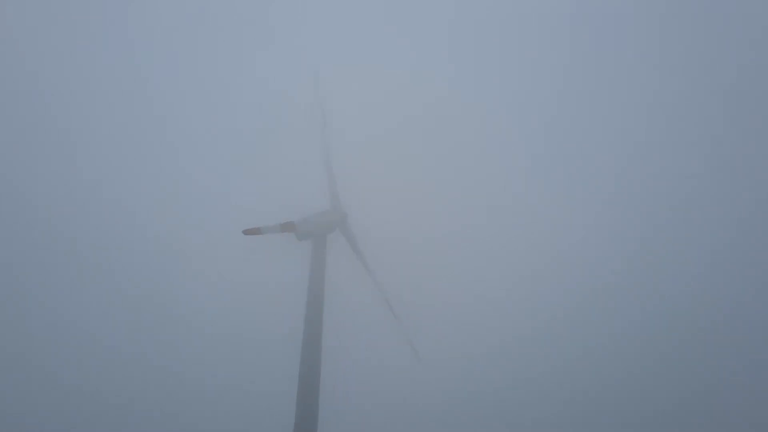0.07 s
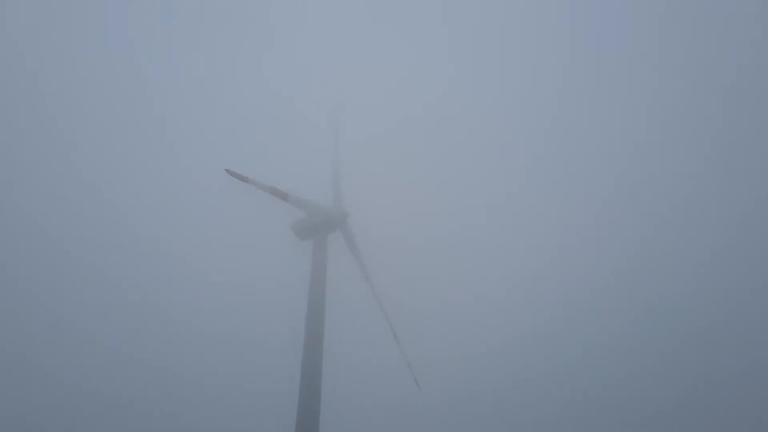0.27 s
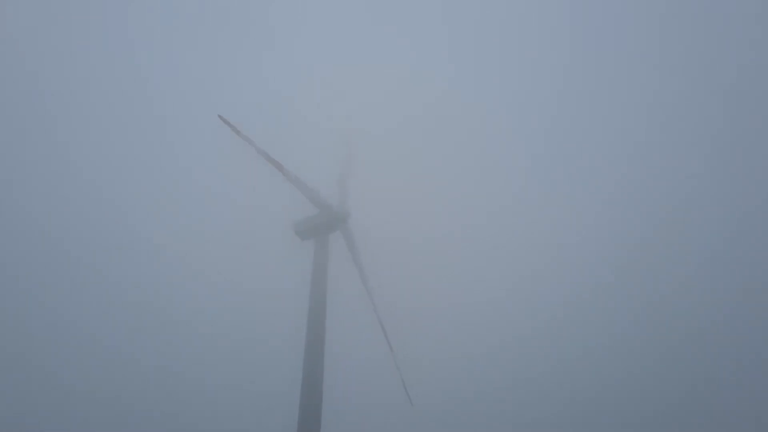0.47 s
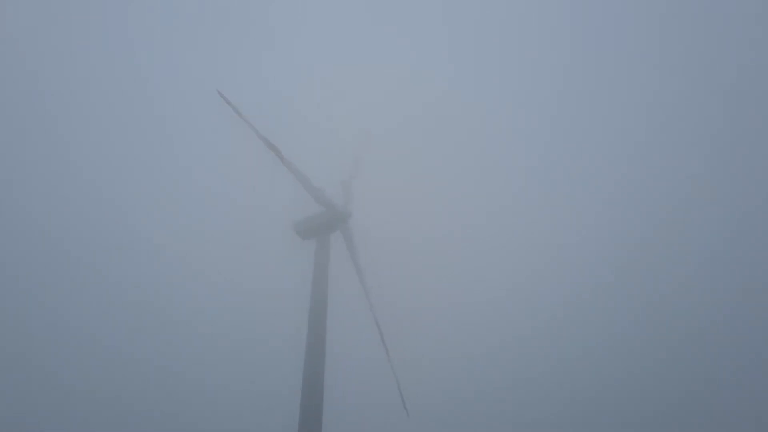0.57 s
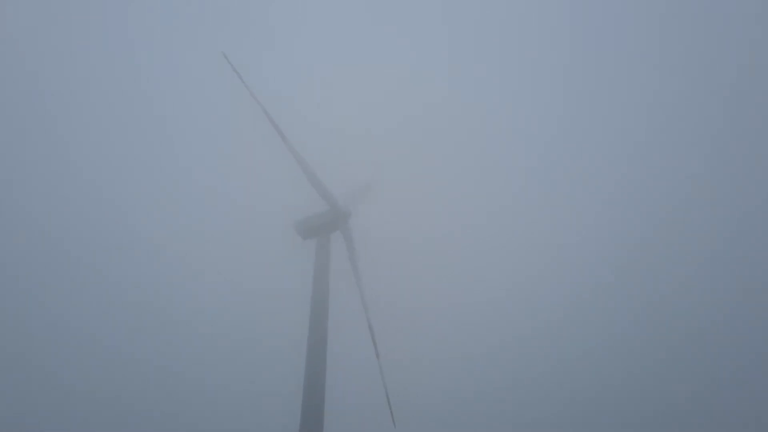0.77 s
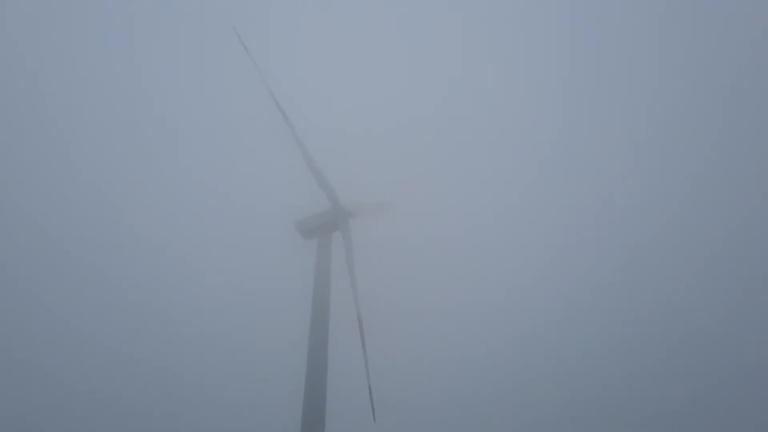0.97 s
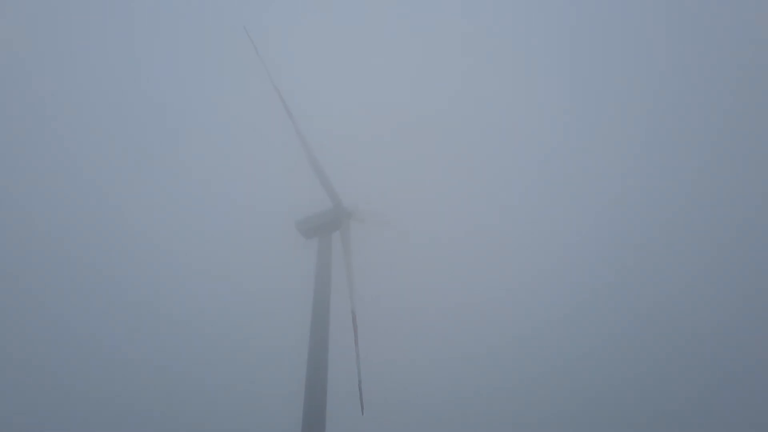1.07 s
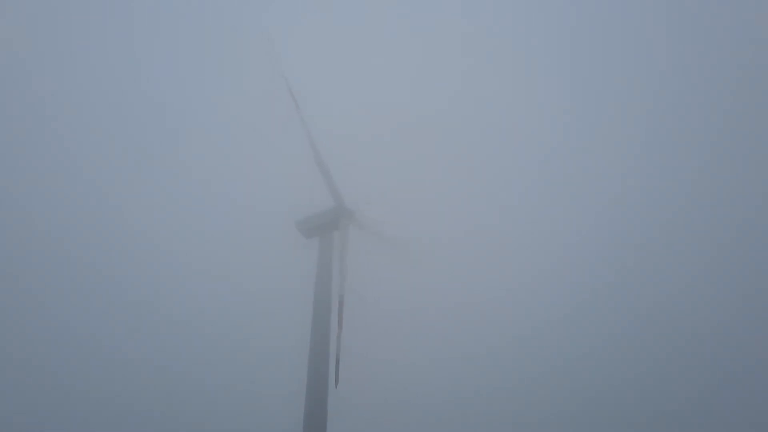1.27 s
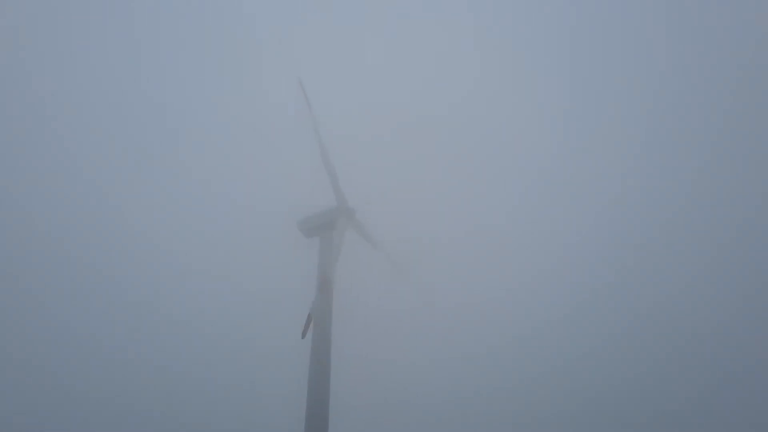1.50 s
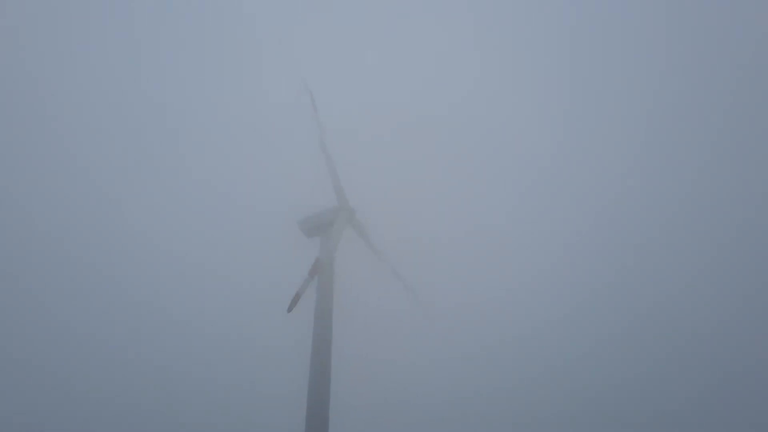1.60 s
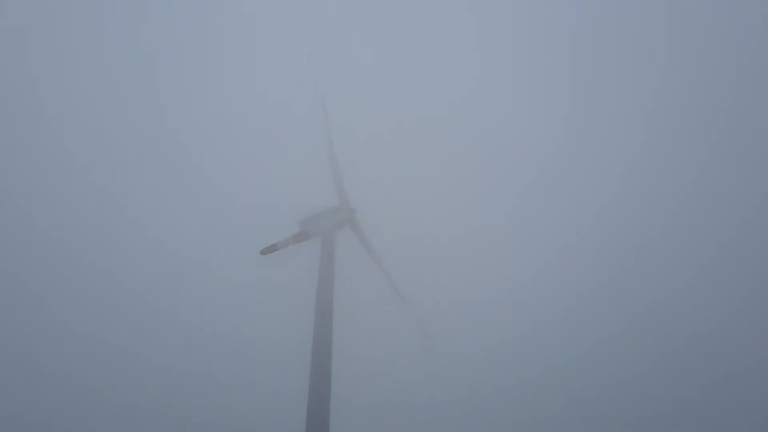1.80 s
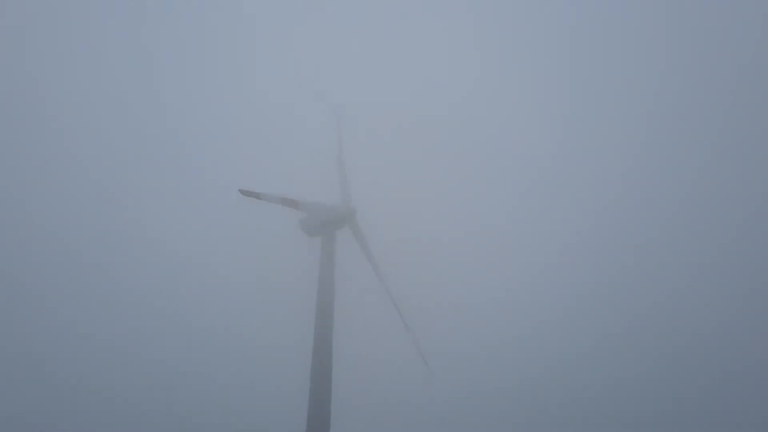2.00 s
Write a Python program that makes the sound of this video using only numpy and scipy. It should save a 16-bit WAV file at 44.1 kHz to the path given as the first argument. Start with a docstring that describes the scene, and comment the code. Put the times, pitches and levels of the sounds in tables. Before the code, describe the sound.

Gusty wind strikes a small unshielded stereo microphone in open country, building into rapid low thumps and hollow flutter, then easing after about a second to weak rumble over faint far air rush and hiss.

```python
"""Gusty wind buffets the two ports of a small microphone in open country, over a far rush of air and recorder hiss.
At first the gusts come and go, and an airy rustle, mostly on the left, fades away.
Then strong eddies slap the ports: each gives a low thump and a ring of the port cavity near 300 Hz.
Deep thuds rock both ports together from early on, and one tiny tick sounds among the slaps.
After about a second the wind eases, leaving low thumps, a few thuds, the rush and the hiss."""
import sys
import numpy as np
from scipy import signal
from scipy.fft import rfft, irfft
from scipy.io import wavfile
from scipy.ndimage import uniform_filter1d

SR = 44100
rng = np.random.default_rng(int(sys.argv[2]) if len(sys.argv) > 2 else 0)


def boost(x):
    """Linear amplitude factor 10**(x/20) for a level x in decibels (scalar or array-like)."""
    u = np.asarray(x, float) / 20
    return 10 ** u


def to_wav(s):
    """Save 16-bit WAV."""
    ch = np.atleast_2d(s).T  # columns
    pcm = np.round(np.clip(ch, -1, 1) * 32767)  # PCM
    wavfile.write(sys.argv[1], SR, pcm.astype(np.int16))


N = 90404

# In every table a positive left-right figure means that the left is louder.
# Tone of the low thump. Each row: frequency in Hz, relative level in dB per Hz.
THUMP_TONE = [(20, -18.5), (40, -13), (65, -2), (95, -1), (140, -2.5), (180, -5), (230, -18.5),
              (300, -43.5), (500, -73)]
# Tone of the ringing port cavity. Each row: frequency in Hz, relative level in dB per Hz.
RING_TONE = [(150, -30.5), (220, -7), (300, 1), (380, -7), (500, -15.5), (700, -29), (1000, -45),
             (1500, -60), (3000, -74.5)]
# Low thumping of the wind. Each row: time in seconds, level in dB before a fixed lift, left-right in dB.
THUMP_CURVE = [(0, -37.5, -7.5), (.1, -52.5, -4), (.13, -34, -7.5), (.16, -57, -7), (.19, -55, 14),
               (.225, -35.5, -2), (.29, -40, 5), (.32, -44.5, -27.5), (.36, -27, -2.5), (.4, -26, -3.5),
               (.43, -42, -1.5), (.48, -46.5, -3), (.505, -29.5, -15.5), (.55, -33.5, 5), (.62, -41, -4),
               (.66, -35, -0.5), (.71, -43, 3.5), (.78, -33.5, 1.5), (.825, -48, 16.5), (.85, -39, 7),
               (.93, -56.5, -7), (.97, -38, 1.5), (1.05, -48.5, 10), (1.09, -43.5, -25),
               (1.16, -44.5, -2.5), (1.2, -43, -20), (1.22, -40, -9), (1.245, -44, -11), (1.3, -50, -12),
               (1.345, -44.5, -5), (1.41, -47.5, -34), (1.49, -55.5, -31), (1.53, -42, -1), (1.58, -54, -4),
               (1.62, -49, -48), (1.68, -62.5, -39), (1.755, -43.5, -10), (1.83, -52, -42), (1.89, -44, -9),
               (1.96, -44, 9.5), (2.01, -55.5, 15), (2.05, -44, 47)]
# Steady ring of the cavity between the slaps. Each row: time in seconds, level in dB.
RING_CURVE = [(.19, -52.5), (.235, -40), (.3, -39.5), (.42, -49), (.45, -36), (.58, -38), (.77, -40),
              (.81, -46.5), (.89, -37.5), (.94, -40.5), (1.02, -38), (1.055, -54), (1.5, -79), (2.05, -74)]
# Change of the ring's upper edge. Each row: time in seconds, gain in dB.
RING_EDGE_CURVE = [(0.25, 1.5), (.5, -4), (.8, -3), (.91, 2.5), (1.02, 9), (1.1, 2)]
# Strong eddies that slap the ports. Each row: time of the peak in seconds, ring level in dB, left-right in dB.
SLAP_EVENTS = [(0.116, -38.5, 3), (0.141, -47.5, 6), (0.249, -26, 0), (0.266, -36, -3), (0.312, -41, 13),
               (0.35, -31.5, 2.5), (.376, -22, 0.5), (0.393, -19, 0.5), (0.444, -28, -0.5), (0.46, -23, -5),
               (0.501, -19, -1.5), (.561, -21.5, 0), (0.596, -31, 14), (0.633, -32, 0),
               (0.656, -20.5, -1.5), (.674, -27.5, -21), (.718, -23, 2.5), (0.756, -18.5, 3),
               (0.785, -22.5, -6.5), (0.836, -40.5, 9.5), (0.853, -24.5, -2), (0.908, -24.5, 2.5),
               (.927, -22, -2.5), (0.961, -25.5, -10.5), (1.016, -24, 3.5), (1.779, -43.5, 5),
               (1.987, -38, -4.5)]
# Tone of the far rush of air. Each row: frequency in Hz, relative level in dB per Hz.
RUSH_TONE = [(140, -35), (230, -5), (298, 0.02), (440, -2), (580, -9), (781, -19), (1060, -19), (1170, -26),
             (1520, -26.5), (1760, -30), (2100, -27), (2380, -22), (2680, -33), (3050, -42), (4000, -73)]
# Balance of the rush, with the left port's own resonance. Each row: frequency in Hz, left-right in dB.
RUSH_SIDES = [(250, 0), (500, -2), (1000, -3), (1700, 0.5), (2500, 13.5), (4000, -2.5)]
# How alike the rush is on both sides. Each row: frequency in Hz, likeness from 0 to 1.
RUSH_ALIKE = [(250, 0.47), (700, 0.81), (1100, 0.26), (2500, 0.2), (4000, 0.05)]
# Slow swell of the rush; only the changes count.
# Each row: time in seconds, level near 1 kHz in dB, level near 2.4 kHz in dB.
RUSH_SWELL = [(0, -73.5, -76), (.2, -74.5, -79.5), (.75, -77, -79), (1.05, -75.5, -76), (1.4, -78.5, -77.5),
              (1.8, -81, -76), (2.05, -82.5, -79)]
# Tone of the recorder hiss. Each row: frequency in Hz, relative level in dB per Hz.
HISS_TONE = [(2500, -4.5), (3200, 3.5), (4500, 0), (6000, -2.5), (8000, -3), (10500, -3), (13000, 1),
             (15500, -6.5), (16500, -31.5)]
# Loudness of the hiss. Each row: time in seconds, level in dB.
HISS_CURVE = [(0, -84), (.8, -81), (1.6, -85.5), (2.05, -84)]
# Tone of the airy rustle. Each row: frequency in Hz, relative level in dB per Hz.
RUSTLE_TONE = [(5800, -31), (7000, -2), (9000, -0.5), (11000, -0.5), (12500, -3), (15500, -5.5),
               (16500, -38.5)]
# Loudness of the rustle on the left, before its flicker. Each row: time in seconds, level in dB.
RUSTLE_CURVE = [(0, -75.5), (.36, -77), (.42, -79.5), (.65, -83.5), (.85, -102.5)]
# Deep single thuds. Each row: time of the middle in seconds, level there in dB, pitch in Hz.
THUD_EVENTS = [(0.057, -30.5, 100), (.285, -33, 55), (.392, -15.5, 84), (.507, -16.5, 103.6),
               (0.656, -22, 70.1), (0.991, -24, 133), (1.263, -29, 97), (1.551, -32.5, 77),
               (1.903, -36.5, 79.5)]
# The tiny tick. Each row: start in seconds, level in dB, left-right in dB.
TICK_EVENTS = [(0.7437, -58.5, 15)]


def rms_one(x):
    """Scale every channel to rms 1."""
    return x / np.sqrt(np.mean(x ** 2, axis=-1, keepdims=True) + 1e-20)


def in_time(rows):
    """Read the columns of a time table at every sample."""
    s, *columns = np.transpose(rows)
    return [np.interp(np.arange(N) / SR, s, c) for c in columns]


def at_hz(points, hz):
    """Read a frequency table on a log-frequency axis, with -120 outside it."""
    p = np.array(points)
    return np.interp(np.log(np.maximum(hz, 1)), np.log(p[:, 0]), p[:, 1], left=-120, right=-120)


def colour(x, spectrum):
    """Filter x with the tone of a table, never ahead of time (minimum phase), and scale to rms 1."""
    bins = np.arange(N // 2 + 1) * SR / N
    cepstrum = irfft(np.log(boost(at_hz(spectrum, bins))), N)
    # Folding the second half onto the first makes the filter minimum-phase.
    cepstrum[1:N // 2] *= 2
    cepstrum[N // 2 + 1:] = 0
    response = np.exp(rfft(cepstrum))
    return rms_one(irfft(rfft(x) * response, N))


def sides(pan_db):
    """Left and right gains of constant power."""
    g = boost(np.array([pan_db / 2, -pan_db / 2]))
    return g / np.sqrt(np.mean(g ** 2, axis=0))


def drift(rate_hz):
    """Slow random wander with spread 1, computed at every 40th sample."""
    r = np.exp(-80 * np.pi * rate_hz / SR)
    slow = signal.lfilter([1], [1, -2 * r, r * r], rng.standard_normal(N // 40 + 2002))
    slow = rms_one(slow[2000:])  # skip the filter's start
    return np.interp(np.arange(N) / 40, np.arange(len(slow)), slow)


def evened(x, window_s):
    """Divide out most of the slow level so that the loudness curves can set it."""
    size = int(window_s * SR)
    power = uniform_filter1d(uniform_filter1d(x ** 2, size=size), size=size)
    return rms_one(x / np.sqrt(power + 0.033))


def above(x, cut_hz):
    """The part of x above a frequency, without delay."""
    return signal.sosfiltfilt(signal.butter(2, cut_hz, "high", fs=SR, output="sos"), x)


def eddies():
    """Small eddies are pressure jolts, mostly pushes at the left port and pulls at the right."""
    EDDIES_PER_S, EDDY_SPREAD_DB = 300, 4  # average count per port; average size above the smallest
    PUSH_SHARE, SMOOTH_SHARE = 0.661, 0.57  # share of pushes (left) or pulls (right); smooth noise to jolts
    size_draw, sign_draw, when_draw = rng.random((3, 2, N))
    sizes = boost(EDDY_SPREAD_DB * np.minimum(-np.log(size_draw + 1e-9), 4))
    sign = np.tanh((PUSH_SHARE - sign_draw) * 20) * [[1], [-1]]
    jolts = rms_one(sizes * sign * (when_draw < EDDIES_PER_S / SR))
    return jolts + SMOOTH_SHARE * rng.standard_normal((2, N))


def slaps(jolts, power):
    """Strong eddies add a big jolt at each port and a short flare to the power of the ring."""
    RISE_S, FALL_S = 0.0044, 0.0084
    JOLT, LEAD_S = 2.2, 0.00311  # jolt size; usual lead of the jolt over the flare's peak
    lateness_s = rng.uniform(-0.0017, 0.0013, (len(SLAP_EVENTS), 2))
    for (s, db, pan_db), late in zip(SLAP_EVENTS, lateness_s):
        t = np.arange(N) / SR - s
        flare = np.where(t < 0, np.exp(-(t / RISE_S) ** 2), np.exp(-np.abs(t) / FALL_S))
        power = power + (boost(db) * sides(np.array([pan_db])) * flare) ** 2
        jolt_at = ((s - LEAD_S + late) * SR).astype(int)
        jolts[[0, 1], jolt_at] += JOLT * np.array([1, -1])
    return jolts, power


def port_thump(jolts, ring_db):
    """The jolts push each port with a low thump, brighter in stronger wind."""
    UPPER_HZ, UPPER_FOLLOWS = 126, 0.31  # second: dB of upper thump per dB of steady ringing
    thump = evened(colour(jolts, THUMP_TONE), window_s=0.021)
    brighten = boost(UPPER_FOLLOWS * (ring_db - ring_db.mean())) - 1
    return thump + above(thump, UPPER_HZ) * brighten


def cavity_ring(jolts):
    """The jolts set the port cavity ringing near 300 Hz, with an upper edge that varies."""
    LIKENESS, EDGE_HZ, EDGE_BALANCE_DB = 0.044, 390, 4
    unlike = jolts - LIKENESS * jolts[::-1]  # a little of the other port, upside down
    ring = evened(colour(unlike, RING_TONE), window_s=0.016)
    [edge_db] = in_time(RING_EDGE_CURVE)
    edge_gain = boost(edge_db) * sides(np.array([EDGE_BALANCE_DB]))
    return ring + above(ring, EDGE_HZ) * (edge_gain - 1)


def wind():
    """The same jolts drive thump and ring; slaps flare the ring and add a lump of thump."""
    THUMP_LIFT_DB, SLAP_THUMP = 4, 0.21  # second: share of the ring's power added to the thump's
    thump_db, thump_pan = in_time(THUMP_CURVE)
    [ring_db] = in_time(RING_CURVE)
    steady_power = boost(2 * ring_db) * np.ones((2, 1))
    jolts, ring_power = slaps(eddies(), steady_power)
    lumps = uniform_filter1d(ring_power, size=SR // 80)
    thump_power = (boost(thump_db + THUMP_LIFT_DB) * sides(thump_pan)) ** 2 + SLAP_THUMP * lumps
    return np.sqrt(thump_power) * port_thump(jolts, ring_db) + np.sqrt(ring_power) * cavity_ring(jolts)


def rush():
    """Third-octave bands of far noise, each flickering a little; the upper ones swell slowly."""
    LEVEL_DB, FLICKER_DB, FLICKER_HZ = -60, 1.2, 4.3  # level before swell and flicker
    low_db, high_db = in_time(RUSH_SWELL)
    bins = np.arange(N // 2 + 1) * SR / N
    shaped = rfft(rng.standard_normal((2, N))) * boost(at_hz(RUSH_TONE, bins))
    scale = np.sqrt(np.mean(irfft(shaped, N) ** 2))
    edges = 200 * 2 ** (np.arange(14) / 3)
    out = 0
    for low, high in zip(edges, edges[1:]):
        mid, side = irfft(shaped * ((bins >= low) & (bins < high)), N) / scale
        hz = np.clip(np.sqrt(low * high), 250, 4000)
        alike = np.clip(at_hz(RUSH_ALIKE, hz), 0, .99)
        swell = (low_db - low_db[-1]) * (750 < hz < 1300)
        swell = swell + (high_db - high_db.mean()) * (1700 < hz < 3000)
        gain = boost(swell + FLICKER_DB * drift(FLICKER_HZ)) * sides(np.array([at_hz(RUSH_SIDES, hz)]))
        # The shared part is the same on both sides, the other part is opposite.
        out = out + gain * (np.sqrt(1 + alike) * mid + np.sqrt(1 - alike) * side * [[1], [-1]])
    return boost(LEVEL_DB) * out


def hiss():
    """Smooth recorder hiss: separate filtered noise on each side."""
    BALANCE_DB = 1  # left-right
    [level_db] = in_time(HISS_CURVE)
    noise = colour(rng.standard_normal((2, N)), HISS_TONE)
    return boost(level_db) * sides(np.array([BALANCE_DB])) * noise


def rustle():
    """Airy, flickering noise at the left port, weaker on the right, that fades."""
    FLICKER_DB, FLICKER_HZ, RIGHT_DB = 1.5, 15, -14
    [level_db] = in_time(RUSTLE_CURVE)
    level = boost(level_db + FLICKER_DB * drift(FLICKER_HZ))
    noise = level * colour(rng.standard_normal(N), RUSTLE_TONE)
    return noise * boost(np.array([[0], [RIGHT_DB]]))


def thuds():
    """A large eddy rocks both ports together through a few slow swings."""
    HALF_LENGTH_CYCLES = 0.76  # from the middle to 1/e of the level
    PHASE_SPREAD = .6  # radians, at most, by which each port leads or lags
    out = 0
    chances = rng.uniform(-1, 1, (len(THUD_EVENTS), 2))
    for (s, db, hz), (phase, apart) in zip(THUD_EVENTS, chances):
        cycles = (np.arange(N) / SR - s) * hz
        port_phase = PHASE_SPREAD * apart * np.array([[1], [-1]])
        swing = np.cos(2 * np.pi * cycles + np.pi * phase + port_phase)
        out = out + boost(db) * np.exp(-(cycles / HALF_LENGTH_CYCLES) ** 2) * swing
    return out


def ticks():
    """A tiny tick: a snap of bright noise and a short ring of the casing."""
    SNAP_T60_S, SNAP_CUT_HZ = .008, 3700  # T60: time to fall by 60 dB
    RING_HZ, RING_T60_S, RING_DB = 2630, 0.012, -2.5  # ring level is relative to the tick's
    out = np.zeros((2, N))
    sharp = signal.butter(2, SNAP_CUT_HZ, "high", fs=SR, output="sos")
    for s, db, pan_db in TICK_EVENTS:
        t = np.clip(np.arange(N) / SR - s, 0, None)
        burst = rng.standard_normal(N) * (t > 0) * boost(-60 * t / SNAP_T60_S)
        snap = signal.sosfilt(sharp, burst)
        ring = boost(RING_DB - 60 * t / RING_T60_S) * np.sin(2 * np.pi * RING_HZ * t)
        out = out + boost(db) * sides(np.array([pan_db])) * (snap + ring)
    return out


def scene():
    """Add up all the sounds on the left and right."""
    return wind() + rush() + hiss() + rustle() + thuds() + ticks()


def low_pass(x):
    """Removes everything above the highest recorded frequency."""
    return signal.sosfilt(signal.butter(12, 15720, fs=SR, output="sos"), x)


def record(dry):
    """Turn the finished mix into the sound that is written out."""
    return low_pass(dry)


dry = scene()
out = record(dry)
to_wav(out)
```